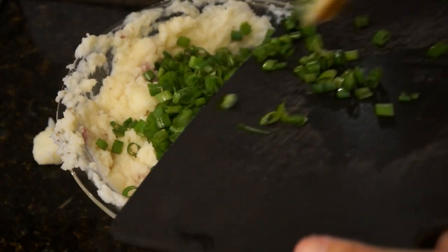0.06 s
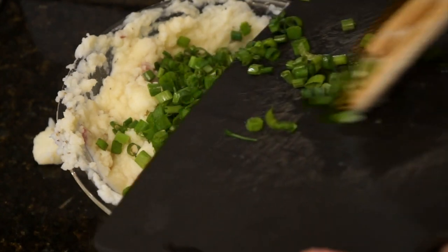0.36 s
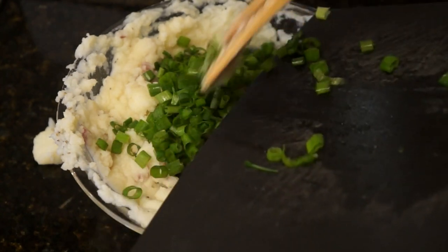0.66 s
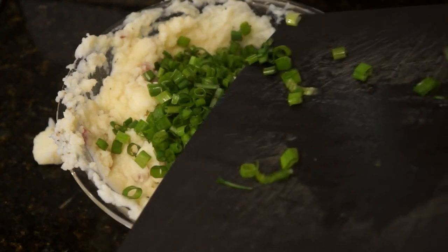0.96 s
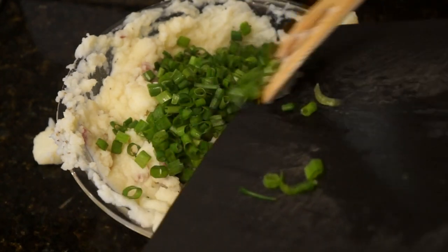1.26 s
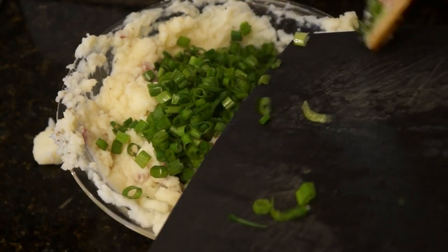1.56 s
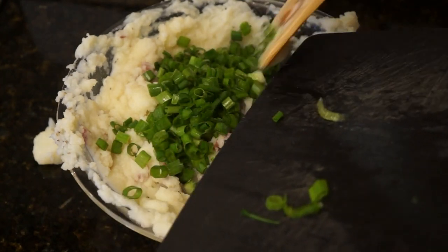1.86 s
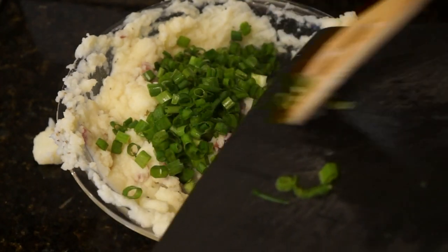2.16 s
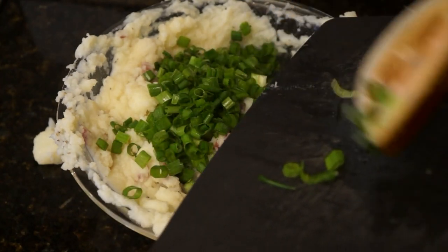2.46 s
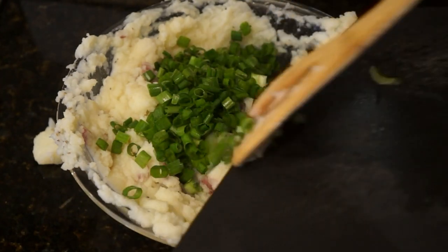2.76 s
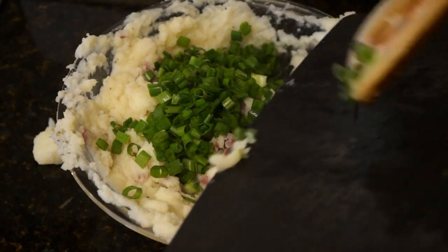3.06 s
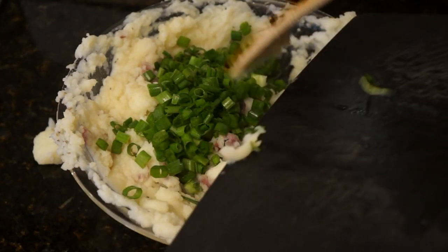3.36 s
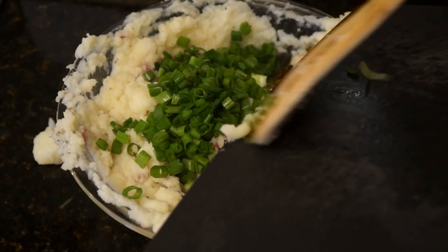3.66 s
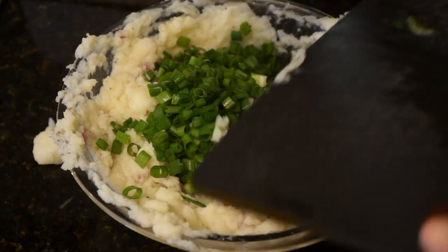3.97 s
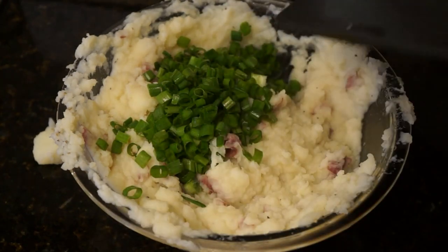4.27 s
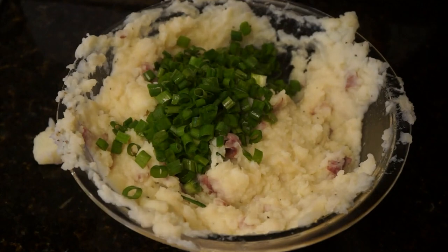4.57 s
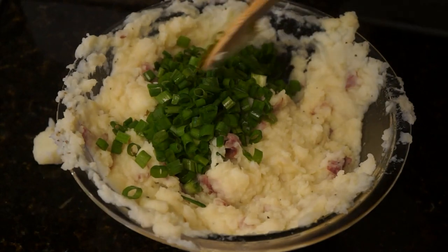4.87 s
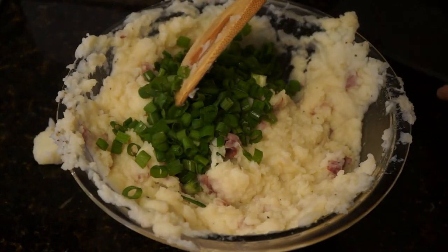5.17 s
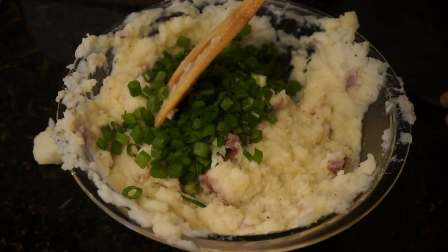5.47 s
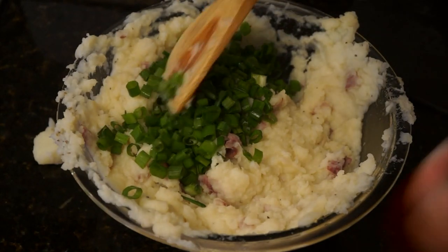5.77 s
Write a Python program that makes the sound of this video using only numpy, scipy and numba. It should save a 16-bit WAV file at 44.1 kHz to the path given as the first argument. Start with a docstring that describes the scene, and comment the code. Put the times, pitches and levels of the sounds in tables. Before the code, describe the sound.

A wooden spoon knocks and scrapes chopped onions off a cutting board into a glass bowl, then the board clatters onto a stone counter.

```python
"""A wooden spoon knocks on a hand-held cutting board and scrapes chopped spring onions into a glass bowl.
Seven stick-slip strokes rasp and make the board drone; onion pieces snap. The board is drawn away and
set down on the stone counter, where it clatters and rings; the spoon plops into the onions and taps
the bowl. A small kitchen with a low hum; a close microphone limits and clips the hardest blows."""
import sys
import numpy as np
from scipy import signal
from scipy.fft import rfft, irfft, next_fast_len
from scipy.io import wavfile
from scipy.ndimage import uniform_filter1d
from numba import njit

SR = 44100
rng = np.random.default_rng(int(sys.argv[2]) if len(sys.argv) > 2 else 0)


def generate_wav(sig):
    """Save sig (samples, or channels by samples) to the path in sys.argv[1] as 16-bit PCM at SR."""
    pcm = np.round(np.clip(np.atleast_2d(sig).T, -1, 1) * 32767).astype(np.int16)
    wavfile.write(sys.argv[1], SR, pcm)


N = 260626
T = np.arange(N) / SR
AGE = T[:int(.7 * SR)]  # time within one event [s]

# board modes: (frequency [Hz], level [dB], free t60 [s])
BOARD_MODES = [(218, -22.5, 0.48), (332, -32, 0.38), (457, 2, 0.34), (502, -5, 0.15), (602.5, -12, 0.22),
               (787, -26.5, 0.36), (865.7, 0.5, 0.11), (901, 0, 0.13), (973, -6, 0.11), (1270, -1, 0.099),
               (1377, -3, 0.18), (1477, -2.5, 0.092), (1613, -14.5, 0.27), (1724, -13, 0.1),
               (1775, -3.5, 0.16), (2103, -10.5, 0.052), (2247, -6, 0.12), (2960, -13, 0.3),
               (3057, -15, 0.18), (3397, -14, 0.25), (3840, -14, 0.25), (4296, -16, 0.2), (4501, -14, 0.2)]
MAIN_MODE_HZ = BOARD_MODES[2][0]
# spectrum of scrapes and snaps: (frequency [Hz], level [dB])
RASP_SPECTRUM = [(300, -25), (700, 2), (1200, 3.5), (1700, -0.5), (2600, -5), (4200, 1), (5700, -5),
                 (7500, -4), (10000, -5.5), (12000, -8.5), (14000, -16), (16000, -15)]


def undb(db):
    """Decibels to gain."""
    return 10 ** (np.asarray(db) / 20)


def unit(x):
    """Scale to rms 1."""
    return x / np.sqrt(np.mean(x ** 2))


def fade(t60_s):
    """Exponential decay, 60 dB in t60_s."""
    return np.exp(-np.log(1000) * AGE / t60_s)


def along(points, hz):
    """Interpolate on a log-frequency axis."""
    point_hz, value = np.transpose(points)
    return np.interp(np.log(hz + 1), np.log(point_hz), value)


def convolve(x, response):
    """Filter each channel, keeping the length."""
    return signal.fftconvolve(np.atleast_2d(x), np.atleast_2d(response), axes=1)[:, :np.shape(x)[-1]]


def colour(x, spectrum, size=2048):
    """Minimum-phase filter of unit energy with the given spectrum."""
    cepstrum = irfft(np.log(undb(along(spectrum, np.fft.rfftfreq(size, 1 / SR)))))
    cepstrum[1:size // 2] *= 2
    cepstrum[size // 2 + 1:] = 0
    response = irfft(np.exp(rfft(cepstrum)))
    return convolve(x, response / np.linalg.norm(response))


def cut(x, hz, kind, order=2):
    """Low-pass or high-pass."""
    return signal.sosfilt(signal.butter(order, hz, kind, fs=SR, output="sos"), x)


def band(x, hz, ratio):
    """Pass hz / ratio to hz * ratio."""
    return cut(cut(x, hz / ratio, "high", order=6), hz * ratio, "low", order=6)


def noise(width, size=len(AGE)):
    """Stereo white noise; width is the side-to-mid ratio."""
    mid, side = rng.standard_normal((2, size))
    return np.array([mid + width * side, mid - width * side]) / np.hypot(1, width)


def add(out, start_s, sound):
    """Mix a sound in at start_s."""
    i = int(start_s * SR)
    out[:, i:i + sound.shape[-1]] += sound[..., :N - i]


def background():
    """Kitchen rumble, a wavering hum, and a hiss that the board shades until drawn away."""
    # rumble: (time [s], level [dB])
    rumble_levels = [(0, -41.5), (.9, -45), (1.6, -44.5), (2.05, -50), (2.5, -46), (3.05, -48),
                     (3.6, -46.5), (4.3, -44.5), (5.1, -43), (5.9, -42.5)]
    # spectra: (frequency [Hz], level [dB])
    rumble_spectrum = [(25, 7), (50, -3.5), (75, -4), (110, 4), (190, -5.5), (335, 0.5), (450, -7.5),
                       (600, -11), (1000, -12.5), (2200, -21), (5000, -22.5), (10000, -28.5),
                       (16000, -33.5)]
    hiss_spectrum = [(800, -5.5), (2000, 0), (5000, 4.5), (7000, 0.5), (10000, -2.5), (14000, -17)]
    rumble_db = np.interp(T, *np.transpose(rumble_levels))
    rumble = undb(rumble_db) * colour(noise(width=.75, size=N), rumble_spectrum)
    waver = unit(cut(rng.standard_normal(N), 1.7, "low"))
    hum = undb(-51.5) * (1 + .5 * waver) * np.sin(2 * np.pi * 100 * T)
    hiss_db = np.interp(T, [3.87, 4.2], [-73.5, -51])
    hiss = undb(hiss_db) * colour(noise(width=.65, size=N), hiss_spectrum)
    return rumble + hum + hiss


def edge_comb(hz, place):
    """Waves returning from the board's edge comb its low modes by place of contact; -1 to 1."""
    return np.cos(2 * np.pi * place * hz / MAIN_MODE_HZ) / (1 + (hz / 2200) ** 4)


def board_ring(place, damping, comb_db, scatter_db=0, tuning=1):
    """Decaying board modes; a hand damps and detunes them, the place of contact weights them."""
    hz, db, t60_s = np.transpose(BOARD_MODES)
    gains = undb(db + comb_db * edge_comb(hz, place) + scatter_db * rng.standard_normal((2, len(hz))))
    modes = [np.sin(2 * np.pi * tuning * f * AGE) * fade(t / damping) for f, t in zip(hz, t60_s)]
    return gains @ np.array(modes)


def knocks():
    """Spoon on the held board: damped modes, a dense clack, a low thud and a contact tick."""
    # (time [s], level [dB], contact cut-off [Hz], thud [dB], place [0-1], main mode [Hz])
    blows = [(0.1659, -21, 1630, -23, 0.1, 462), (0.3382, -10.5, 1790, -16.5, 0.2, 462),
             (0.643, -21, 2780, -7.5, 0.28, 454), (1.0870, -13, 1570, -13, 0.4, 458),
             (1.692, -13.5, 1800, -28, 0.34, 457.6), (2.1326, -11.5, 1970, -31, 0.03, 464),
             (2.2373, -27.5, 514, -3, 0.03, 453), (2.245, -34, 730, -2, 0, 427),
             (2.6119, -9.5, 1810, -18, 0.09, 469.4), (3.2190, -9.5, 1250, -15, 0.23, 470),
             (3.6993, -19, 1410, 0.5, 0.21, 434), (3.801, -30, 1840, -18, .5, 440)]
    # (frequency [Hz], level [dB])
    clack_spectrum = [(100, 28.5), (300, -30), (480, 27), (680, 15.5), (900, 19.5), (1130, -0.5), (1400, 3),
                      (2100, 15.5), (3000, 14.5), (8000, -19)]
    hz = np.geomspace(100, 8000, 60)
    low_modes = sum(undb(db - BOARD_MODES[0][1]) * np.sin(2 * np.pi * f * AGE)
                    for f, db, _ in BOARD_MODES[:2])
    out = np.zeros((2, N))
    for start_s, db, contact_hz, thud_db, place, main_hz in blows:
        ring = board_ring(place, damping=3.4, comb_db=4.5, scatter_db=2, tuning=main_hz / MAIN_MODE_HZ)
        combed = np.column_stack([hz, along(clack_spectrum, hz) + 5 * edge_comb(hz, place)])
        clack = colour(noise(width=.08) * fade(.034), combed)
        wood = cut(undb(-5) * ring + undb(6.5) * clack, contact_hz, "low", order=4)
        thud = undb(thud_db) * low_modes * fade(.048)
        tick = undb(-26) * noise(width=.42) * fade(.049)
        blow = cut(wood + thud + tick, 202, "high", order=4)
        onset_rms = np.sqrt(np.mean(blow[:, AGE < .02] ** 2))
        add(out, start_s, undb(db) * blow / onset_rms)
    return out


def snaps():
    """Crisp onion pieces crack under the spoon's edge."""
    # (time [s], level [dB])
    breaks = [(0.2098, -42.5), (2.1954, -22), (2.2134, -37), (2.2256, -22.5), (2.245, -22), (3.246, -23.5)]
    out = np.zeros((2, N))
    for start_s, db in breaks:
        burst = colour(noise(width=.4) * fade(.033), RASP_SPECTRUM)
        add(out, start_s, undb(db) * cut(burst, 6900, "high"))
    return out


def slips(per_s, spread_db):
    """Dense stick-slip impulses of uneven size, rms 1."""
    sizes = undb(spread_db * np.minimum(rng.exponential(size=N), 5))
    slipping = rng.random(N) < per_s / SR
    return unit(sizes * slipping * noise(width=.055, size=N))


def wander(x, depth_db):
    """Narrow bands swell and fade for some 30 ms each as the contact point travels."""
    bands = signal.stft(x, nperseg=512)[2]
    drift = uniform_filter1d(rng.standard_normal(bands.shape[1:]), size=6, axis=0)
    drift = uniform_filter1d(drift, size=7, axis=1)
    return signal.istft(bands * undb(depth_db * unit(drift)))[1][:, :N]


def pressure_db(age_s, push_s, follow_s, swell_db, ease_db, bite_db, bite_s=.042):
    """Stroke pressure builds in the push, eases in the follow-through and bites at the board's edge."""
    pushed = np.clip(age_s / push_s, 0, 1) ** 1.07
    eased = np.clip((age_s - push_s) / follow_s, 0, 1)
    at_edge = np.clip(1 + (age_s - push_s - follow_s) / bite_s, 0, 1)
    return swell_db * (pushed - 1) - ease_db * eased + bite_db * np.sin(np.pi / 2 * at_edge)


def scrapes():
    """The spoon's edge catches and slips on rough wood: a bright rasp over the board's drone."""
    # (start [s], push [s], follow-through [s], swell [dB], ease [dB], bite [dB], rasp [dB],
    #  drone [dB], place [0-1], drone cut-off [Hz], squeak [dB])
    strokes = [(.36, .12, .152, 9, 4, 6, -31.5, -30, .18, 2500, -13),
               (1.12, .075, .14, 14, 6, 1.5, -30.5, -23.5, .41, 1700, -10),
               (1.71, .10, .016, 8, 0, 6.5, -33.5, -30.5, .12, 1900, -14),
               (2.15, .07, .078, 8, 1, 3, -33, -30, .12, 1660, -19),
               (2.635, .10, .108, 12, 6, 2, -30, -31, .06, 2100, -19),
               (3.24, .065, .04, 5, 10, 1, -30, -33, .45, 1200, -19),
               (3.42, .08, .17, 3, 1, 0, -66, -48, .5, 1400, -25),
               (3.72, .068, .026, 14, 5, 1, -35.5, -41, .32, 2800, -16),
               (4.04, .048, .01, 18, 10, 0, -43, -48, .4, 2700, -25)]  # the faintest two: the board slides on the bowl
    touch_s, lift_s = .025, .016
    hand_wobble_db, hand_wobble_hz = 1.63, 30
    friction = slips(per_s=14000, spread_db=1.8)
    grain = wander(colour(friction, RASP_SPECTRUM), depth_db=2.8)
    wobble_db = hand_wobble_db * unit(cut(rng.standard_normal(N), hand_wobble_hz, "low"))
    out = np.zeros((2, N))
    for start_s, push_s, follow_s, *shape_db, rasp_db, drone_db, place, drone_hz, squeak_db in strokes:
        age_s = T - start_s
        contact = np.clip(1 + np.minimum(age_s / touch_s, (push_s + follow_s - age_s) / lift_s), 0, 1)
        active = contact > 0
        force = undb(pressure_db(age_s[active], push_s, follow_s, *shape_db) + wobble_db[active])
        rasp = unit(cut(grain[:, active], 12950, "low", order=4))
        # wet wood turns shrill where pressed hardest
        squeak = undb(squeak_db) * force * unit(band(grain[:, active], hz=5680, ratio=2.08))
        drone = convolve(friction[:, active], board_ring(place, damping=2.6, comb_db=4))
        drone = cut(drone, drone_hz, "low", order=3)
        drone = unit(cut(drone, 347, "high", order=4))  # the drone carries little below 350 Hz
        stroke = undb(rasp_db) * (rasp + squeak) + undb(drone_db) * drone
        add(out, T[active][0], contact[active] * force * stroke)
    return out


def crack():
    """The brief burst of a hard contact."""
    # (frequency [Hz], level [dB])
    contact_spectrum = [(100, 2), (300, -6), (500, 1.5), (800, 4), (1500, 2.5), (2200, 1.5), (3100, 8.5),
                        (5200, 6), (7500, 2.5), (10000, 2), (16000, 10)]
    return colour(noise(width=.46) * fade(.014), contact_spectrum)


def thump():
    """A low, dull ring in the counter."""
    return unit(band(noise(width=.3), hz=115, ratio=1.5)) * fade(.25)


def clatter():
    """The free board bounces on stone, on one edge, then flat: crack, clink, ringing wash and thump."""
    # (time [s], level [dB], place [0-1])
    bounces = [(4.8910, 0.5, 0.1), (4.9310, -8, 0), (4.9547, -12.5, 0.72), (5.1140, -23.5, 0.44),
               (5.1967, 5.5, .5), (5.2298, 3, .5), (5.2507, 4.5, .5), (5.262, -5, 0.58), (5.2728, -5, .5),
               (5.2944, -10.5, 0.35), (5.3281, 5.5, 0.4), (5.3423, -8, .5), (5.354, -8, 0.3),
               (5.401, -10, 0.33), (5.4370, -12, 0.45)]
    # dense ringing: (frequency [Hz], level [dB])
    wash_spectrum = [(100, -31), (200, -9.5), (300, 3), (500, -17), (800, 2.5), (1500, 1.5), (2200, 0),
                     (3100, -1), (5500, 0), (6100, -9.5), (7500, -8), (10000, -5), (16000, -59)]
    out = np.zeros((2, N))
    for start_s, db, place in bounces:
        clink = undb(-6) * unit(band(noise(width=.99), hz=3180, ratio=1.27)) * fade(.013)
        wash = undb(-18) * colour(noise(width=.37) * fade(.59), wash_spectrum)
        tuning = 1 + .0048 * rng.standard_normal()
        ring = board_ring(place, damping=1, comb_db=8.5, scatter_db=5, tuning=tuning)
        ring = undb(-23) * cut(ring, 470, "high", order=1)
        # a harder bounce is brighter, and its crack grows faster than its ring and thump
        contact_hz = 7300 * 2 ** (.015 * db)
        ring_db, thump_db = -5 + .7 * db, -35.5 + .21 * db
        blow = undb(db) * (undb(4.5) * crack() + clink) + undb(ring_db) * (wash + ring)
        blow = cut(blow, contact_hz, "low", order=4)
        add(out, start_s, cut(blow, 180, "high", order=3) + undb(thump_db) * thump())
    return out


def plops():
    """The spoon digs into the onions: a hollow resonance, and a tap on the bowl that thumps the counter."""
    # (time [s], plop [dB], pitch [Hz], tap [dB], tap cut-off [Hz], thump [dB])
    digs = [(5.399, -14.5, 740, -18, 3100, -37), (5.435, -17.5, 726, -20, 2500, -37),
            (5.5756, -16, 763, 0.5, 2920, -34), (5.6307, -18, 357, -9, 6700, -30)]
    out = np.zeros((2, N))
    for start_s, db, hz, tap_db, tap_hz, thump_db in digs:
        hollow = unit(band(noise(width=1), hz, ratio=1.27)) * fade(.069)
        tap = cut(cut(crack(), tap_hz, "low", order=3), 210, "high", order=3)
        add(out, start_s, undb(db) * hollow + undb(tap_db) * tap + undb(thump_db) * thump())
    return out


def room(dry, delay_s=.006, rise_s=.0009):
    """Cupboards and walls reflect; the treble dies first."""
    echoes = noise(width=.67) * np.clip((AGE - delay_s) / rise_s, 0, 1)
    dull = cut(echoes, 7800, "low", order=1) * fade(.52)
    bright = cut(echoes, 1500, "high", order=1) * fade(.25)
    response = unit(dull + bright) / np.sqrt(len(AGE))
    return undb(-11.5) * cut(convolve(dry, response), 373, "high")


def scene():
    """All sources in the kitchen."""
    dry = knocks() + scrapes() + snaps() + clatter() + plops()
    return dry + room(dry) + background()


@njit
def follow(x, attack_s, release_s):
    """One-pole envelope follower."""
    out, level = np.empty(len(x)), 0.
    for i in range(len(x)):
        level += (x[i] - level) / (SR * (attack_s if x[i] > level else release_s))
        out[i] = level
    return out


def limit(x, threshold_db, attack_s, release_s):
    """Turn down whatever exceeds the threshold; the first crack slips through."""
    envelope = follow(np.abs(x).max(axis=0), attack_s, release_s)
    return x / np.maximum(1, envelope / undb(threshold_db))


def record(dry):
    """Two microphone ports, out of phase in the bass, the right louder; limiter, clipping, top cut."""
    # left port's lead: (frequency [Hz], phase [rad])
    port_lead = [(30, 1.9), (230, 2.0), (400, 1.55), (800, .9), (1300, .55), (2400, .3), (4400, 0)]
    tilt_db, top_hz = .7, 15900
    size = next_fast_len(N + SR)
    sides = np.array([[1], [-1]])
    phase_shift = np.exp(.5j * sides * along(port_lead, np.fft.rfftfreq(size, 1 / SR)))
    ports = irfft(rfft(dry, size) * phase_shift, size)[:, :N] * undb(-tilt_db * sides)
    clipped = np.clip(limit(ports, threshold_db=-4, attack_s=.0012, release_s=.025), -1, 1)
    return signal.sosfilt(signal.ellip(8, .2, 70, top_hz, fs=SR, output="sos"), clipped)


dry = scene()
out = record(dry)
generate_wav(out)
```